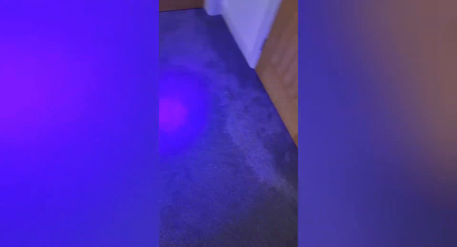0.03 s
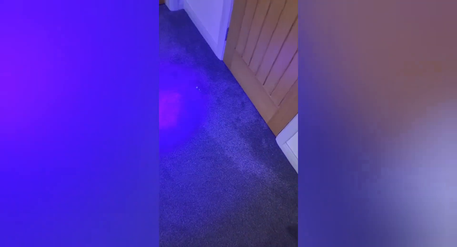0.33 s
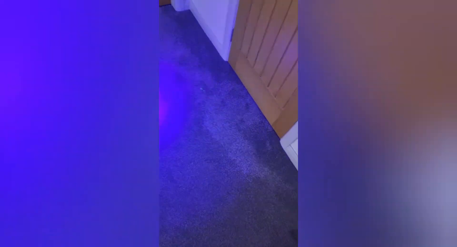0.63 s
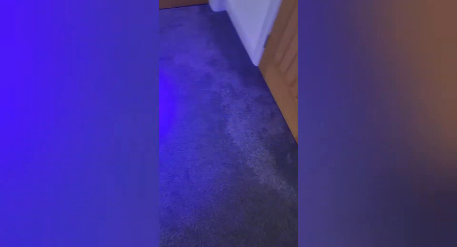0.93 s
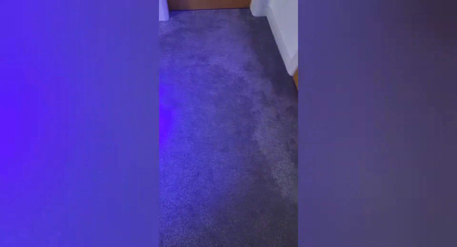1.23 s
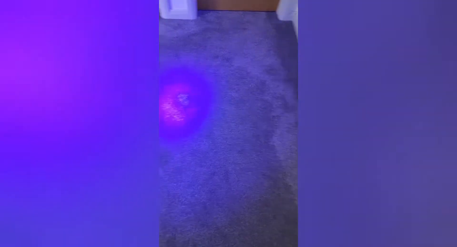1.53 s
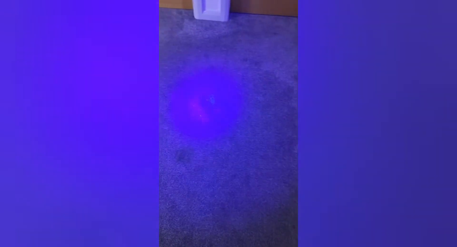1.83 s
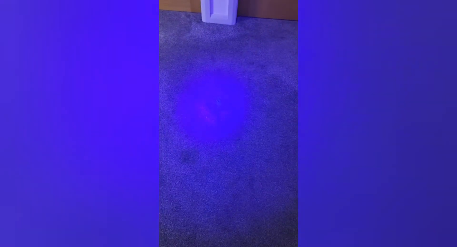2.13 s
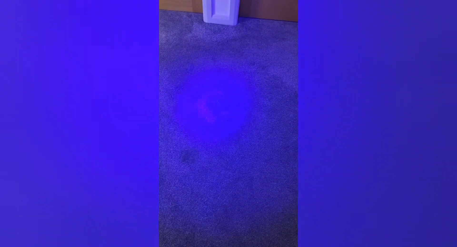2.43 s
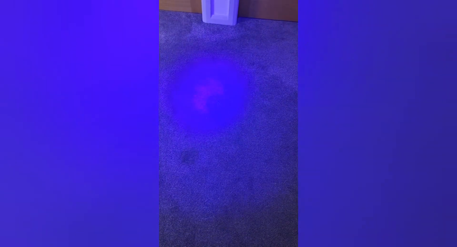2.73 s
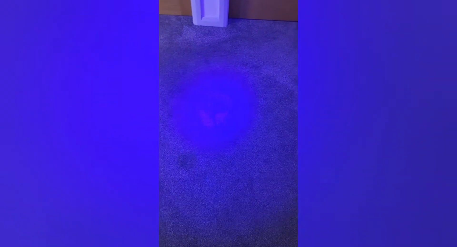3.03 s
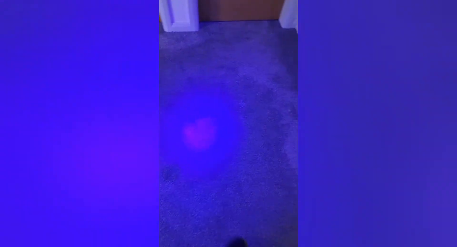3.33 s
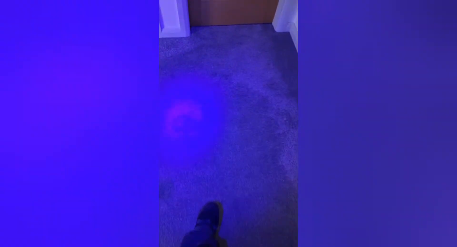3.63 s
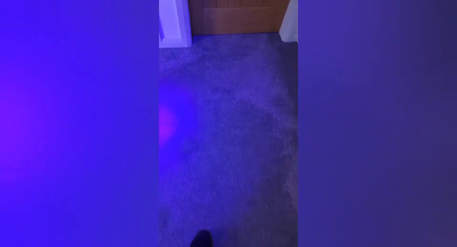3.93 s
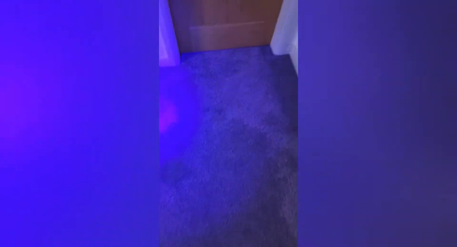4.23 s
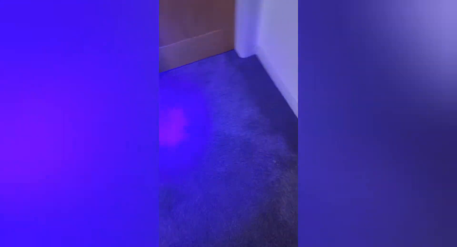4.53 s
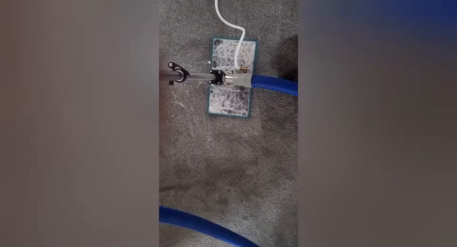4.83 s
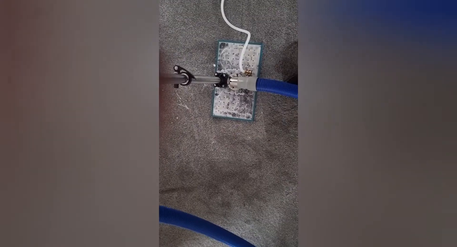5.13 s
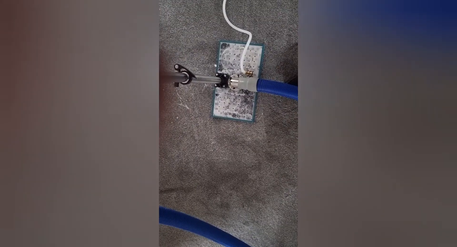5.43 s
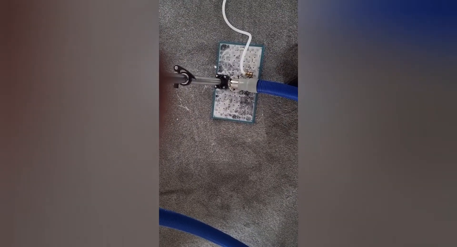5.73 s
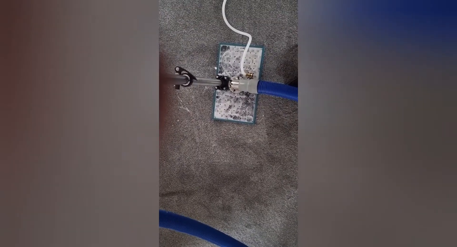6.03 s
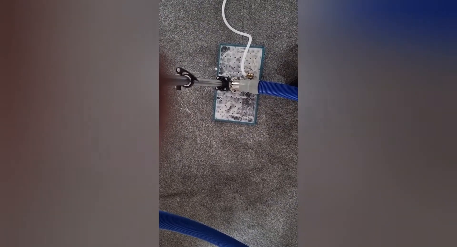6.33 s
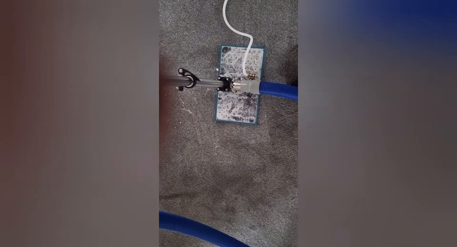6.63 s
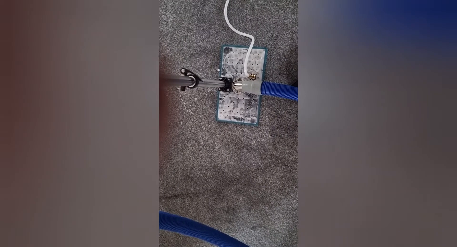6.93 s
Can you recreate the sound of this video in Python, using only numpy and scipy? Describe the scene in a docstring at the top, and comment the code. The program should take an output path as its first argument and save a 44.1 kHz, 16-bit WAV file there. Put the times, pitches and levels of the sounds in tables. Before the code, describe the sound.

In a quiet room with a faint low rumble, someone steps softly across carpet, with light clothing rustles, small clicks and one dull thump. A shoe scuffs and knocks briefly. Then the sound cuts abruptly to a carpet extractor running close to the microphone: a loud, steady hiss of suction over a low engine drone and blower hum, with a few faint slurps of water.

```python
"""Soft steps cross the carpet of a quiet room: friction makes clothes rustle and a shoe scuff,
and impacts set the floor knocking. After an abrupt cut a carpet extractor runs close by.
Turbulent air hisses into its suction head and excites the resonances of the tube, over the
steady harmonic drone of an engine and the lobed vacuum blower that it turns."""
import sys
import numpy as np
from scipy import signal
from scipy.fft import rfft, irfft, next_fast_len
from scipy.io import wavfile
from scipy.ndimage import uniform_filter1d, map_coordinates

SR = 44100
rng = np.random.default_rng(int(sys.argv[2]) if len(sys.argv) > 2 else 0)


def generate_wav(signal):
    """Clip the signal to [-1, 1] and save it as 16-bit WAV at the path in sys.argv[1]."""
    frames = np.transpose(np.atleast_2d(signal))
    scaled = np.clip(frames, -1, 1) * 32767
    pcm = np.round(scaled).astype(np.int16)
    wavfile.write(sys.argv[1], SR, pcm)


N = 308259

CUT_S, EXTRACTOR_START_S = 4.770, 4.827
ENGINE_CYCLE_HZ, PULSES_PER_CYCLE = 20.235, 7

# Noise spectra, shape only: frequency_hz, density_db
HISS_SPECTRUM = [(600, -24), (1100, -11), (1700, -7.5), (2600, -1.3), (3700, -2.7), (4850, .3),
                 (5550, -2.3), (6750, -.8), (7450, -5.5), (8200, -13.7), (11200, -13.2), (12400, -3.5),
                 (14200, -.8), (15600, -2.8)]  # air rushing into the suction head
WATER_SPECTRUM = [(1200, -19), (2100, -6), (2900, 1), (3700, -10), (6000, -13), (8500, -27)]  # slurping water
HOSE_SPECTRUM = [(20, -19), (50, -2), (100, -3), (180, -3), (225, -9.5), (340, -6), (420, -11), (520, -7),
                 (700, -1.5), (830, -6), (1100, -12.5), (1800, -20)]  # turbulence in the hose
PILE_SPECTRUM = [(100, -10), (250, 3), (420, -3.5), (560, 7.5), (1100, 4.5), (1700, -7.5), (2600, -12),
                 (4600, -8.5), (5200, -20), (6600, -17.5), (7500, -27.5), (8300, -49), (15500, -39)]  # carpet pile crushed underfoot
CLOTH_SPECTRUM = [(100, 2), (250, -5), (400, 4.5), (540, 6), (800, 2.5), (1300, -1), (1800, -9), (2600, -9),
                  (4000, -9.5), (5300, -12.5), (6700, -8), (7500, -14.5), (8400, -35), (15500, -26)]  # rubbing cloth
SOLE_SPECTRUM = [(60, -24), (150, -10), (260, 4), (400, -3.5), (700, 1), (1500, -15), (3000, -20),
                 (7000, -33), (8500, -40), (13000, -43.5), (15500, -42)]  # a dragged sole
ROOM_SPECTRUM = [(20, -18.5), (60, 4), (95, -4), (170, -3), (270, -2), (400, -7), (850, -3), (1700, -19),
                 (3000, -25), (5500, -31), (7200, -27.5), (8200, -49.5), (15500, -40.5)]  # the quiet room
# Stereo width of the noises: frequency_hz, side_minus_mid_db
HISS_WIDTH = [(300, -3), (700, 2), (1300, 4.5), (2400, 0.5), (3800, 2), (5100, 5), (5900, -0.5),
              (7000, 3.5), (9000, 1.5), (13000, -0.5), (14000, 1), (15300, -6)]
HOSE_WIDTH = [(150, -22), (380, -1), (700, 0.5), (1200, 3.5)]
ROOM_WIDTH = [(80, -11.5), (280, -8), (700, 4.5), (2000, 0.5)]
# Stereo balance of the noises: frequency_hz, left_minus_right_db
HISS_BALANCE = [(1300, -3), (2400, -2.5), (5000, -2), (6500, 0), (9000, 0), (11500, -0.5), (12500, 0.5),
                (14000, 8.5), (15500, -9)]
HOSE_BALANCE = [(150, 2), (380, 2.5), (750, 1.5), (1200, -5.5)]
ROOM_BALANCE = [(80, -1), (280, -4), (900, -3), (2500, 0)]
# Partials of the rotating parts: multiple, level_db, left_minus_right_db
ENGINE_PARTIALS = [(2, -61, 1), (3, -46.5, .5), (4, -52, 0), (6, -54, 1), (8, -53, 2), (9, -58.5, 1),
                   (10, -66, 1), (12, -68, 1), (15, -63.5, 3), (16, -68, 2), (17, -67, 2)]  # multiples of the engine cycle rate
BLOWER_PARTIALS = [(1, -38, 0), (2, -57.5, 4), (3.5, -62.5, 1), (4, -69.5, -1), (4.5, -54, 1),
                   (5, -50, -16.5), (6, -62, 4), (7, -60, 15), (8, -65.5, 2)]  # multiples of the lobe pulse rate
# Resonances: centre_hz, bandwidth_hz, gain_db
TUBE_MODES = [(1880, 21, -14), (1990, 20, -0.5), (2460, 28, -12), (2790, 30, -4), (3310, 36, -9),
              (6110, 52, -5)]  # the suction head and its tube
LOW_ROOM_MODES = [(230, 18, -3), (281.5, 18, -0.5), (347, 27, -1.5), (535, 40, -9.5)]
# Water drawn in with the air: centre_s, length_s, level_db
WATER_GULPS = [(5.267, .15, -41.5), (6.145, 0.062, -42), (6.56, .05, -38.5), (6.752, .056, -39.5)]
# A shoe strikes the carpeted floorboards: start_s, level_db, pitch_hz
HEEL_STRIKES = [(1.9605, -41, 101), (2.402, -54.5, 240), (4.546, -47, 280), (4.5605, -44, 263),
                (4.587, -50, 240)]
# Small hard clicks: start_s, level_db, pitch_hz, cutoff_hz
HARD_CLICKS = [(.7598, -52, 2150, 3000), (1.303, -52, 1550, 1800), (4.247, -56, 1900, 2200),
               (4.5156, -51, 2700, 11000), (4.6546, -54, 3200, 6500)]
# Weight rolls onto the pile: peak_s, level_db, hold_s
PILE_PRESSES = [(0.027, -73, .12), (1.95, -59, .21), (2.55, -69, .1), (3.2, -66, .1)]
# Clothes brush as a limb moves: peak_s, level_db
CLOTH_BRUSHES = [(1.91, -70), (2.61, -70), (3.08, -66), (3.2, -61.5), (3.77, -64), (3.98, -67), (4.25, -65)]
# Spurts of the faint whine: peak_s, level_db
WHINE_SPURTS = [(.07, -88), (1.02, -87), (2.5, -84), (3.77, -83), (4.15, -80)]


def suction():
    """Turbulence in the gap under the head, with gulps of water, drives the tube's resonances."""
    air = amp(-30.5 + 0.1 * wobble(2.94)) * noise(HISS_SPECTRUM, HISS_WIDTH, HISS_BALANCE, patchy_db=0.6)
    gulps = sum(amp(db) * np.exp(-2 * ((clock() - s) / length) ** 2) for s, length, db in WATER_GULPS)
    gulps *= amp(1.8 * wobble(90))
    water = gulps * noise(WATER_SPECTRUM, HISS_WIDTH, HISS_BALANCE, patchy_db=0.5)
    return wall_echoes(resonate(air + water, TUBE_MODES), echo_db=-10)


def engine_and_blower():
    """Periodic pulses give line spectra, phase-locked because the governed engine turns the blower."""
    cycles = np.cumsum(ENGINE_CYCLE_HZ * (1 + 0.00079 * wobble(5))) / SR
    engine = shaft_tones(ENGINE_PARTIALS, cycles, waver_db=0.85, diffuse_hz=800)
    blower = shaft_tones(BLOWER_PARTIALS, PULSES_PER_CYCLE * cycles, waver_db=0.48, diffuse_hz=815)
    return engine + blower


def hose():
    """Turbulent flow in the hose radiates steady, low broadband noise."""
    return amp(-45.5) * noise(HOSE_SPECTRUM, HOSE_WIDTH, HOSE_BALANCE, patchy_db=0.3)


def knocks():
    """Impacts excite free vibration: boards thump under a dull heel; the clicks are higher and shorter."""
    feet = [(s, db, impact(thump_hz=hz, thump_db=-3.5, thump_t60=0.05, tick_hz=584, tick_t60=0.025,
                           cutoff_hz=1500, crack_db=-7, reverb_db=-10))
            for s, db, hz in HEEL_STRIKES]
    clicks = [(s, db, impact(thump_hz=620, thump_db=-2, thump_t60=0.018, tick_hz=hz, tick_t60=0.014,
                             cutoff_hz=cutoff_hz, crack_db=-4.5, reverb_db=-5.5))
              for s, db, hz, cutoff_hz in HARD_CLICKS]
    out = np.zeros((2, N + SR))
    for start_s, db, sound in feet + clicks:
        start = round(start_s * SR)
        out[:, start:start + sound.shape[1]] += amp(db) * sound
    return out[:, :N] * panned(lean_db=-4.0)[:, None]


def rustle():
    """Friction sounds as weight crushes the pile, clothes brush and stir, and a sole drags once."""
    weight = sum(amp(db) * swell(s, 0.041, hold_s, 0.22) for s, db, hold_s in PILE_PRESSES)
    brushes = sum(amp(db) * swell(s, 0.035, 0.022, 0.071) for s, db in CLOTH_BRUSHES)
    walk_s = 2.96
    stir = amp(-71.5) * swell(walk_s, 0.08, CUT_S - walk_s, 0.071)
    drag = amp(-47.5) * swell(peak_s=4.518, attack_s=0.011, hold_s=0.054, release_s=0.053)
    pile = friction(weight, PILE_SPECTRUM, catch_hz=70, catch_db=1.5, patchy_db=2.1)
    cloth = friction(np.hypot(brushes, stir), CLOTH_SPECTRUM, catch_hz=70, catch_db=1.2, patchy_db=1.5)
    sole = friction(drag, SOLE_SPECTRUM, catch_hz=150, catch_db=1.3, patchy_db=0)
    return pile + cloth + sole


def whine():
    """Amplitude modulation makes a faint, unsteady high tone flicker and come in spurts."""
    spurts = sum(amp(db) * swell(s, 0.04, 0.06, 0.035) for s, db in WHINE_SPURTS)
    level = (amp(-90) + spurts) * amp(3.5 * wobble(18))
    pitch_hz = 2910 + 9 * wobble(40)
    return level * np.sin(2 * np.pi * np.cumsum(pitch_hz) / SR)


def room_rumble():
    """Noise with its power at low frequencies is heard as a soft, even rumble."""
    return amp(-64.0) * noise(ROOM_SPECTRUM, ROOM_WIDTH, ROOM_BALANCE, patchy_db=0.6)


def shaft_tones(partials, cycles, waver_db, diffuse_hz):
    """Partials lock to a shaft; in the room's echoes higher ones waver and differ more between the ears."""
    mean_hz = cycles[-1] * SR / N
    out = np.zeros((2, N))
    for multiple, db, lean_db in partials:
        diffuseness = min(multiple * mean_hz / diffuse_hz, 1)
        apart_rad = 1.1 * diffuseness * rng.choice([-1, 1])
        phase = 2 * np.pi * (multiple * cycles + rng.random()) + 0.31 * diffuseness * wobble(25)
        level = amp(db + waver_db * (1 + 2 * diffuseness) * wobble(12)) * panned(lean_db)[:, None]
        out += np.sqrt(2) * level * np.sin([phase + apart_rad / 2, phase - apart_rad / 2])
    return out


def impact(thump_hz, thump_db, thump_t60, tick_hz, tick_t60, cutoff_hz, crack_db, reverb_db, room_t60=0.22):
    """Damping makes a thump, a woody tick and their reverberation each fall 60 dB in t60 seconds."""
    t = np.arange(SR // 3) / SR
    thump = amp(thump_db - 60 * t / thump_t60) * np.sin(2 * np.pi * thump_hz * t)
    around_tick = signal.butter(1, [tick_hz * 0.3, tick_hz * 2], "bandpass", fs=SR)
    crack = unit(signal.lfilter(*around_tick, rng.standard_normal(len(t))))
    tick = amp(-60 * t / tick_t60) * (np.sin(2 * np.pi * tick_hz * t) + amp(crack_db) * crack)
    direct = signal.lfilter(*signal.butter(4, cutoff_hz, fs=SR), thump + tick)
    tail = rng.standard_normal((2, len(t))) * amp(-60 * t / room_t60)
    reverb = signal.fftconvolve(direct[None], tail / np.linalg.norm(tail[0]), axes=1)[:, :len(t)]
    return direct + amp(reverb_db) * reverb


def friction(envelope, spectrum, catch_hz, catch_db, patchy_db):
    """Rubbing surfaces catch unevenly, modulating the level of their noise."""
    catches = amp(catch_db * wobble(catch_hz))
    return envelope * catches * noise(spectrum, ROOM_WIDTH, ROOM_BALANCE, patchy_db)


def resonate(x, modes):
    """Damped modes, driven by x, add their responses to the direct sound."""
    return filtered(x, lambda f: 1 + sum(amp(db) * 1j * f * width / (hz ** 2 - f ** 2 + 1j * f * width)
                                         for hz, width, db in modes))


def wall_echoes(x, echo_db, count=14):
    """Interference with weak wall reflections, different at each ear, ripples the spectrum."""
    delays = rng.integers(SR // 1000, SR // 40, (count, 2))
    echoes = sum(np.array([np.pad(ear, (d, 0))[:N] for ear, d in zip(x, pair)]) for pair in delays)
    return x + amp(echo_db) * echoes / np.sqrt(count)


def noise(spectrum, width, balance, patchy_db):
    """Filtering shapes stereo noise of rms 1, with random patches of gain in time and frequency."""
    bins = signal.stft(rng.standard_normal((2, N)), nperseg=512)[2]
    patches = uniform_filter1d(rng.standard_normal(bins.shape[1:]), size=8, axis=0)
    patches = unit(uniform_filter1d(patches, size=16, axis=1))
    pair = signal.istft(bins * amp(patchy_db * patches), nperseg=512)[1][:, :N]
    mid, side = filtered(pair, lambda hz: amp(along(spectrum, hz)) * panned(-along(width, hz)))
    ears = np.array([mid + side, mid - side])
    return unit(filtered(ears, lambda hz: panned(along(balance, hz))))


def swell(peak_s, attack_s, hold_s, release_s):
    """Exponential growth, a hold, then exponential decay; attack and release are time constants."""
    t = clock() - peak_s
    return np.exp(np.minimum(t, 0) / attack_s - np.maximum(t - hold_s, 0) / release_s)


def wobble(rate_hz):
    """Spline interpolation joins random values, rate_hz a second, into a smooth curve."""
    return map_coordinates(rng.standard_normal(int(N * rate_hz / SR) + 4), [clock() * rate_hz])


def filtered(x, response):
    """A linear filter multiplies the spectrum by its frequency response."""
    size = next_fast_len(N + SR // 2)
    return irfft(rfft(x, size) * response(np.fft.rfftfreq(size, 1 / SR)), size)[..., :N]


def panned(lean_db):
    """Two gains, lean_db apart, conserve total power."""
    gains = amp([lean_db / 2, -lean_db / 2])
    return gains / np.sqrt(np.mean(gains ** 2, axis=0))


def along(points, hz):
    """Interpolation on a logarithmic frequency axis."""
    frequencies, values = np.transpose(points)
    return np.interp(np.log(hz + 1), np.log(frequencies + 1), values)


def amp(db):
    return 10 ** (np.asarray(db) / 20)


def unit(x):
    return x / np.sqrt(np.mean(x ** 2) + 1e-20)


def clock():
    return np.arange(N) / SR


def scene():
    """Sources add by superposition: the room stops dead, then the extractor enters already at speed."""
    t = clock()
    quiet_room = resonate(whine() + room_rumble() + rustle() + knocks(), LOW_ROOM_MODES)
    extractor = engine_and_blower() + hose() + suction()
    fade_in = 1 - np.exp(-np.maximum(t - EXTRACTOR_START_S, 0) / 0.0018)
    return (t < CUT_S) * quiet_room + fade_in * extractor


def record(dry):
    """A steep low-pass filter limits the bandwidth."""
    cutoff_hz = 15750
    return filtered(dry, lambda hz: 1 / (1 + (hz / cutoff_hz) ** 400))


dry = scene()
out = record(dry)
generate_wav(out)
```